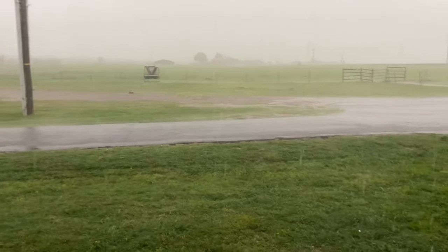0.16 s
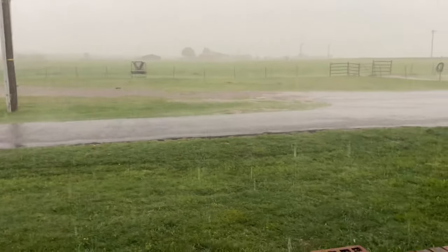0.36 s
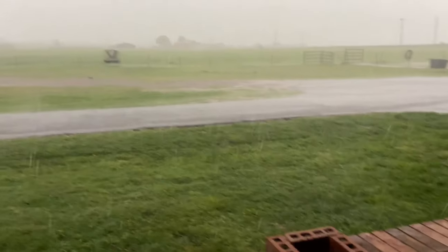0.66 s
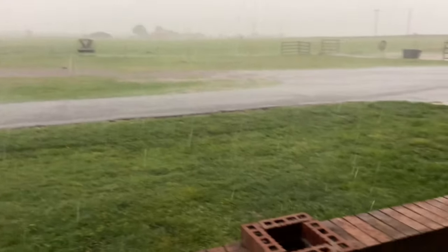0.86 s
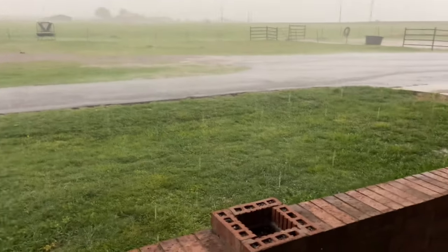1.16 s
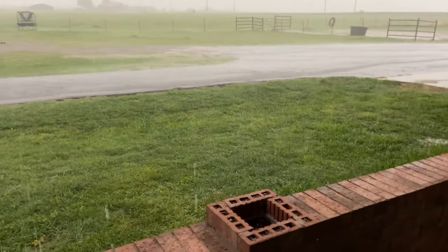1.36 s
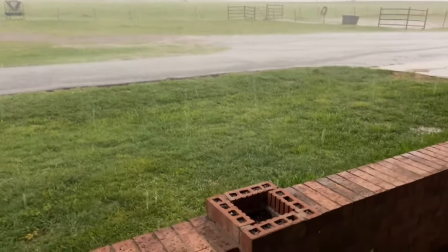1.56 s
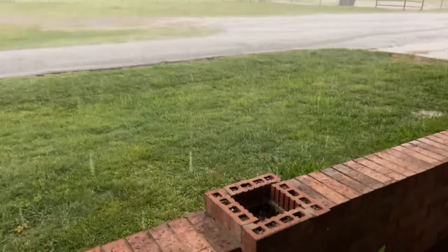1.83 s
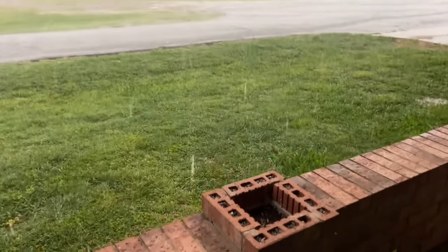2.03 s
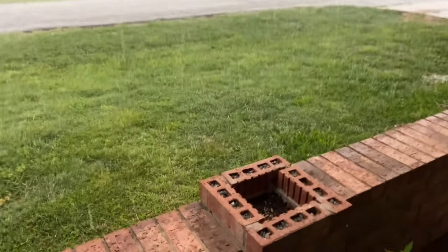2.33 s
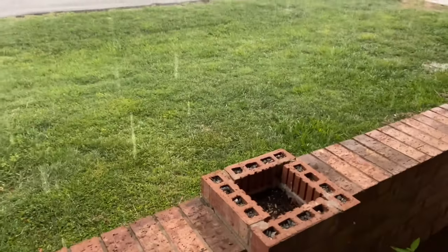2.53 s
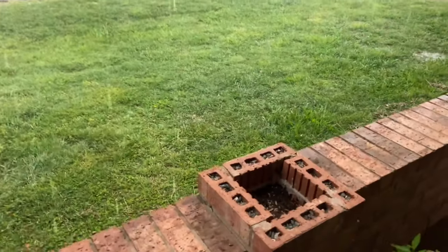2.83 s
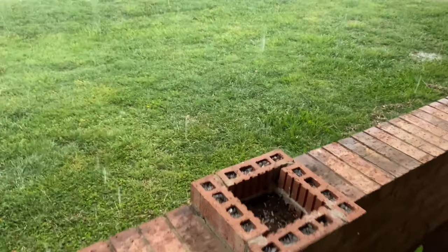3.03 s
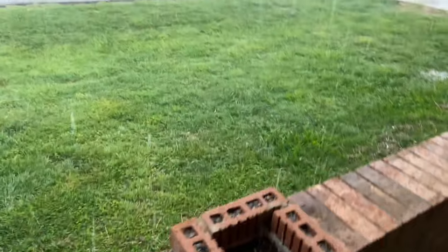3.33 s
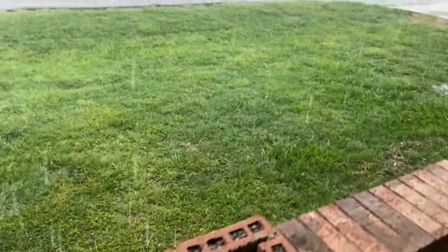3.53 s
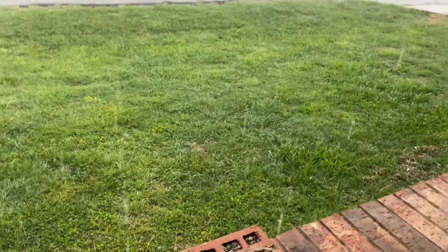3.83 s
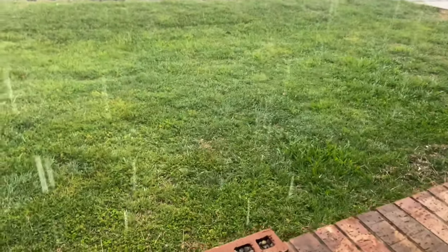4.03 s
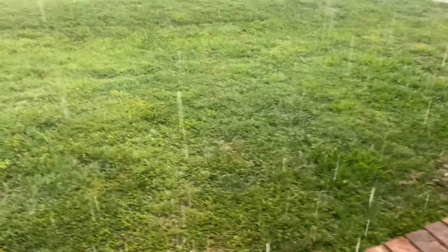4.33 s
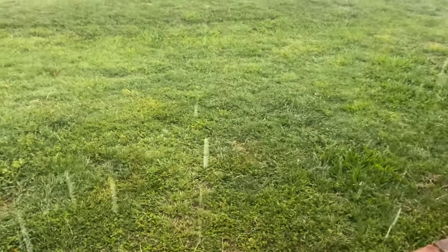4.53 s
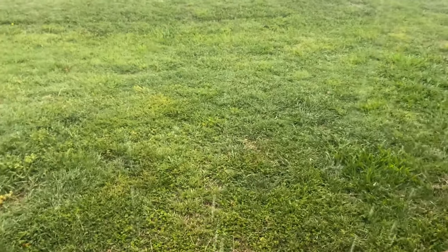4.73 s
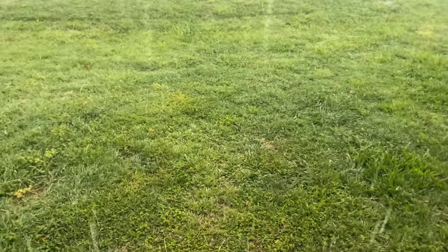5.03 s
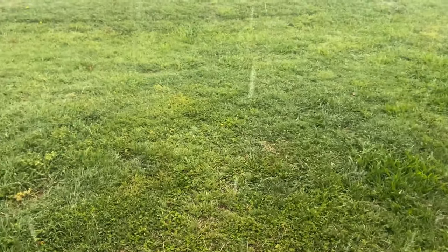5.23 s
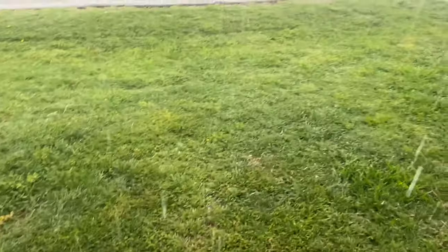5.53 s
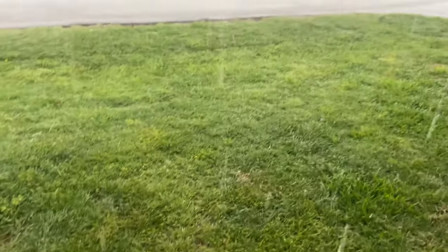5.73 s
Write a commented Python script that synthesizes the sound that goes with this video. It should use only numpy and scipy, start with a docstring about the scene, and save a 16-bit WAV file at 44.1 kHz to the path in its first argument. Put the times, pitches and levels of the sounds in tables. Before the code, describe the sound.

Heavy, steady rain hisses over lawn and driveway, with close drops ticking, splashes bursting nearby and a low rumble of wind.

```python
"""A brick porch, facing a lawn and a driveway in heavy rain, heard at the two ports of a hand-held phone.
Far drops merge into a wash of shaped noise; nearer ones patter and tick as damped sines.
Now and then a gob of water bursts into spray: droplets and mist over a low slosh. Late on, one fat drop
and its rebounds knock on something hollow, a sum of decaying modes. Moving air rumbles underneath
as low noise with gusts and soft bumps; scattered reflections from the porch follow the close drops."""
import sys
import numpy as np
from scipy import signal
from scipy.fft import rfft, irfft, next_fast_len
from scipy.io import wavfile
from scipy.ndimage import uniform_filter1d, map_coordinates

SR = 44100
rng = np.random.default_rng(int(sys.argv[2]) if len(sys.argv) > 2 else 0)


def log_audio(samples):
    """Write samples as a 16-bit WAV file to the path given in sys.argv[1]."""
    # one column per channel
    frames = np.atleast_2d(samples).T
    # limit to full scale, then quantise
    limited = np.clip(frames, -1, 1)
    pcm = np.round(limited * 32767).astype(np.int16)
    wavfile.write(sys.argv[1], SR, pcm)


N = 259308

PORT_LAG = .000275  # (s) the rain reaches the left port later
TOP_HZ = 15750  # upper band limit

# where the phone points, 0 = out at the driveway, 1 = down at the lawn: time_s, lawn_share
FACING = [(0, 0.021), (.9, 0.6), (2, 0.84), (3.2, 1), (5.88, 0.75)]


def amp(db):
    """Level to linear amplitude: 20 dB is a factor of ten."""
    return 10 ** (np.asarray(db) / 20)


def unit(x):
    """Normalisation by signal power: x at rms 1."""
    return x / np.sqrt(np.mean(x ** 2) + 1e-20)


def along(points, hz):
    """Interpolation of (Hz, value) points on a logarithmic frequency axis."""
    f, v = np.transpose(points)
    return np.interp(np.log(hz + 1), np.log(f + 1), v)


def curve(rows):
    """Linear interpolation of (s, value) rows to one value per sample."""
    return np.interp(np.arange(N) / SR, *np.transpose(rows))


def wobble(rate):
    """Slow random modulation: a spline through Gaussian knots, rate of them a second."""
    knots = rng.standard_normal(int(N * rate / SR) + 4)
    return map_coordinates(knots, [np.arange(N) * rate / SR])


def filtered(x, response):
    """Linear filtering: the spectrum of x times a complex response of frequency."""
    n = x.shape[-1]
    m = next_fast_len(n + 8192)  # padding keeps the ends apart
    return irfft(rfft(x, m) * response(np.fft.rfftfreq(m, 1 / SR)), m)[..., :n]


def add(track, s, sound):
    """Superposition: mix a sound into the track from time s on."""
    part = track[..., max(round(s * SR), 0):][..., :sound.shape[-1]]
    part += sound[..., :part.shape[-1]]


def fade(t, t60):
    """Exponential decay: 60 dB in t60, in the unit of t."""
    return np.exp(-np.log(1000) * t / t60)


def burst(t, rise, t60):
    """Excitation and damping: an envelope that rises quickly and dies away."""
    return (1 - np.exp(-t / rise)) * fade(t, t60)


def band(centre_hz, octaves):
    """Band-pass weighting: a Gaussian bell on a logarithmic frequency axis."""
    return lambda hz: np.exp(-.5 * (np.log2((hz + 1) / centre_hz) / octaves) ** 2)


def ports(pair):
    """Interaural-style coherence: mixing two unrelated signals sets likeness, a phase slope sets lag."""
    # likeness of the two ports: frequency_hz, likeness (0-1)
    alike = [(100, 0.8), (300, 0.76), (700, 0.35), (1200, 0.45), (1700, 0.52), (2250, 0.06), (3100, 0.3),
             (4500, 0.15), (5800, 0.05), (7000, 0.5), (9000, 0.95), (10500, 0.65), (13000, 0.95),
             (15000, 0.5)]
    turn = lambda hz: np.arccos(np.clip(along(alike, hz), -1, 1)) / 2
    mid, side = filtered(pair, lambda hz: np.array([np.cos(turn(hz)), np.sin(turn(hz))]))
    left_later = lambda hz: np.exp(1j * np.pi * PORT_LAG * np.outer([-1, 1], hz))
    return filtered(np.array([mid + side, mid - side]), left_later)


def hiss(response, size):
    """Filtered random noise: a wide stereo hiss of rms 1 with the given colour."""
    return unit(ports(filtered(rng.standard_normal((2, size)), response)))


def patchy(pair, depth_db, size):
    """Time-frequency modulation: patches of random gain, size being their extent in bins and frames."""
    z = signal.stft(pair, nperseg=512)[2]
    field = rng.standard_normal(z.shape[1:])
    field = uniform_filter1d(field, size=size[0], axis=0)
    field = uniform_filter1d(field, size=size[1], axis=1)
    return signal.istft(z * amp(depth_db * unit(field)), nperseg=512)[1][:, :pair.shape[1]]


def pitches(centre_hz, octaves, count):
    """Log-normal distribution of drop pitches, capped at the band limit."""
    return np.minimum(centre_hz * 2 ** (octaves * rng.standard_normal(count)), TOP_HZ)


def impacts(times, sizes, hz, cycles, scatter):
    """Damped oscillation: each drop loses 60 dB in the given cycles; direction sets its lag between ports."""
    # spectral weighting of every drop: frequency_hz, gain_db
    drop_colour = [(40, -50), (300, -17), (1500, 9.5), (6000, 15.5), (8500, 10.5), (12000, 11), (13800, 3),
                   (15800, -8)]
    lag = PORT_LAG * (1 - scatter * rng.exponential(size=len(times)) ** 2).clip(-1, 1)
    index = (times * SR).astype(int)[:, None] + np.arange(128)
    sides = []
    for arrival in (times + lag / 2, times - lag / 2):
        # the extra lag lets no arrival fall before its first sample
        turns = np.maximum(index / SR - arrival[:, None] - PORT_LAG, 0) * hz[:, None]
        waves = sizes[:, None] * np.sin(2 * np.pi * turns) * fade(turns, cycles)
        sides.append(np.bincount(index.ravel(), waves.ravel(), N)[:N])
    return filtered(np.array(sides), lambda hz: amp(along(drop_colour, hz)))


def wash(patchy_db):
    """Incoherent summation: countless far drops become coloured noise that flickers in small patches."""
    # relative power density of the far rain: frequency_hz, density_db (per Hz)
    wash_colour = [(30, -39), (90, -4.5), (200, -0.7), (300, -0.8), (900, -2), (1450, -0.2), (2050, -4.5),
                   (2800, -3.1), (3700, -7.6), (5400, -6.1), (6700, -8), (7500, -11.5), (8500, -15.5),
                   (11500, -15.5), (12500, -18), (14000, -25), (15800, -28)]
    pair = patchy(rng.standard_normal((2, N)), patchy_db, size=(4, 8))
    return unit(ports(filtered(pair, lambda hz: amp(along(wash_colour, hz)))))


def patter(centre_hz, octaves, spread_db, count):
    """Random arrivals on nearer grass and brick: many faint drops, a few strong ones."""
    times = rng.uniform(0, N / SR, count)
    sizes = amp(spread_db * np.minimum(rng.exponential(size=count), 4))
    return unit(impacts(times, sizes, pitches(centre_hz, octaves, count), cycles=3.6, scatter=0.12))


def spatters(level_db, spread_db, life, count, size):
    """Clustered arrivals: a drop breaking on brick throws droplets of like pitch, life seconds on average."""
    start = rng.uniform(0, N / SR, (count, 1))
    age = life * rng.exponential(size=(count, size))
    strength = amp(spread_db * rng.uniform(-0.23, 1, (count, 1))) * rng.uniform(0.42, 1, (count, size))
    cluster_hz = np.repeat(pitches(centre_hz=8500, octaves=0.74, count=count), size)
    hz = np.minimum(cluster_hz * 2 ** (0.28 * rng.standard_normal(count * size)), TOP_HZ)
    times = (start + age).ravel()
    return amp(level_db) * unit(impacts(times, strength.ravel(), hz, cycles=14.0, scatter=0.047))


def plinks(level_db, count):
    """Bubble resonance: air trapped in standing water rings briefly, rising a little in pitch."""
    out, t = np.zeros((2, N)), np.arange(SR // 16) / SR
    starts = rng.uniform(0, N / SR, count)
    tones = pitches(2684, .65, count)
    places = rng.uniform(0.06, 1, (count, 3))
    for s, hz, (left, right, lag) in zip(starts, tones, places):
        turns = hz * np.maximum(t - np.array([[lag * PORT_LAG], [0]]), 0)
        ring = np.sin(2 * np.pi * turns * (1 + .6 * t)) * fade(turns, 130)  # 60 dB in 130 cycles
        add(out, s, np.array([[left], [right]]) * ring)
    return amp(level_db) * unit(out)


def rain():
    """Surface-dependent radiation: paving crackles, grass drums softly; the mix shifts as the phone turns."""
    # strength shared by all rain layers, nearly steady: time_s, level_db (relative)
    downpour = [(0.0, -31), (1.15, -30), (2.3, -30.5), (2.65, -30), (5.88, -29.5)]
    strength = amp(curve(downpour) + 0.2 * wobble(10))
    lawn = np.clip(curve(FACING), 0, 1)
    pocks = patter(centre_hz=2880, octaves=.3, spread_db=4, count=1800)
    paving = amp(-5.5) * unit(filtered(pocks, band(centre_hz=2800, octaves=0.13)))
    paving += amp(-9) * hiss(band(centre_hz=1450, octaves=0.23), N)
    grass = amp(-9.0) * hiss(band(centre_hz=585, octaves=0.94), N)
    drops = amp(-7.5) * patter(centre_hz=4300, octaves=0.75, spread_db=3.2, count=9000)
    drops += spatters(level_db=-11, spread_db=3, life=.008, count=190, size=20)
    drops += plinks(level_db=-10.5, count=330)
    far = wash(patchy_db=.9)
    return strength * (amp(3.0) * far + drops + (1 - lawn) * paving + np.sqrt(lawn) * grass)


def air():
    """Low-frequency turbulence: a rumble nearly alike at both ports, gusts, a hollow drone and soft bumps."""
    # relative power density of the rumble: frequency_hz, density_db (per Hz)
    rumble_colour = [(12, -50), (25, -33), (35, -6), (48, -1), (64, 5), (90, -0.5), (125, -2.5), (180, -11),
                     (400, -73)]
    # bell-shaped swells: crest_s, lift_db, width_s (standard deviation)
    gusts = [(0.4, 2.5, 0.08), (1.05, 2, 0.1), (1.37, 8.5, 0.085), (2.75, 2.5, 0.17), (5.68, 4.5, 0.091)]
    # bumps of air on the phone: start_s, level_db (before the envelope), pitch_hz
    bumps = [(1.704, -9, 79.6), (3.355, -14, 85), (4.281, -12, 79), (5.588, -14, 75), (5.658, -11, 83),
             (5.693, -9.5, 87)]
    air_db, wander_db, wander_rate = -38, 0.36, 3.93  # base level, its slow wander, knots a second

    mid, side = filtered(rng.standard_normal((2, N)), lambda hz: amp(along(rumble_colour, hz)))
    rumble = unit(mid + amp(-16) * np.array([side, -side]))
    drone = hiss(band(centre_hz=282, octaves=0.2), N) * amp(-4 * curve(FACING))  # fainter towards the lawn
    t = np.arange(N) / SR
    gust_db = sum(lift_db * np.exp(-.5 * ((t - s) / width) ** 2) for s, lift_db, width in gusts)
    swell = amp(air_db + gust_db + wander_db * wobble(wander_rate))
    out = swell * (amp(2.0) * rumble + amp(-4.5) * drone)
    t = np.arange(SR // 6) / SR
    for s, level_db, pitch_hz in bumps:
        add(out, s, amp(level_db) * np.sin(2 * np.pi * pitch_hz * t) * burst(t, rise=0.0038, t60=0.05))
    return out


def splashes(mist_db, droplet_db, spread_db, count):
    """Break-up of a liquid mass: droplets and mist over a slosh; duller, heavier drops fall back after."""
    # gobs bursting, levels relative: start_s, spray_db, lowest_hz (of the spray), rise_s, t60_s,
    # fall_db (drops falling back), slosh_db
    gobs = [(0.001, -25.5, 2400, .003, .3, -36, -26), (0.36, -26, 2400, .02, .35, -27, -40),
            (0.615, -26.5, 5600, .005, .25, -45, -45), (1.1055, -15.6, 2500, .001, .35, -18.5, -24),
            (1.47, -28, 4500, .008, .3, -45, -45), (2.501, -19.2, 2700, .004, .45, -26, -26),
            (2.718, -25, 2800, .005, .2, -40, -35), (3.05, -27, 5400, .004, .2, -28, -27),
            (3.992, -19.7, 5500, .0015, .38, -28, -27), (4.3, -26, 2400, .02, .4, -27, -24),
            (4.909, -21, 4300, .018, .33, -34, -31), (5.577, -25, 2400, .004, .18, -34, -30),
            (5.642, -17.3, 2400, .02, .32, -29, -26)]
    # spray with three bright ridges: frequency_hz, density_db (per Hz)
    spray_colour = [(2000, 0.5), (2750, 5), (3800, -2.5), (5300, 2.5), (6300, -1.5), (7200, -0.5),
                    (8200, -3.5), (9800, -3.5), (12000, -7), (13000, -14), (15800, -28)]
    big_gob_db = -17.5  # a spray level this high throws the full number of droplets
    fall_delay_s, fall_low_hz, fall_high_hz, fall_rise_s, fall_t60_s = 0.012, 2050, 4600, 0.016, 0.41
    out, t = np.zeros((2, N)), np.arange(SR // 2) / SR

    def spray(lowest_hz, highest_hz, level_db):
        """Band-limited mist and single droplets; a smaller gob throws fewer droplets."""
        def colour(hz):
            """Filter slopes: steep below the lowest pitch, gentle above the highest."""
            edges = (1 + (lowest_hz / (hz + 1)) ** 14) * (1 + (hz / highest_hz) ** 4)
            return amp(along(spray_colour, hz)) / np.sqrt(edges)

        n = int(count * np.clip(amp(level_db - big_gob_db), .25, 1))
        when, strength, pitch = rng.uniform(size=(count, 3))[:n].T
        droplet_hz = lowest_hz + pitch * (TOP_HZ - lowest_hz) * .7
        droplets = impacts(when * t[-1], amp(-spread_db * strength), droplet_hz, cycles=9, scatter=.2)
        droplets = unit(filtered(droplets[:, :len(t)], colour))
        mist = unit(patchy(hiss(colour, len(t)), depth_db=3.2, size=(3, 2)))
        return amp(level_db) * (amp(mist_db) * mist + amp(droplet_db) * droplets)

    for s, spray_db, lowest_hz, rise, t60, fall_db, slosh_db in gobs:
        add(out, s, spray(lowest_hz, TOP_HZ, spray_db) * burst(t, rise, t60))
        falling = spray(fall_low_hz, fall_high_hz, fall_db)
        add(out, s + fall_delay_s, falling * burst(t, fall_rise_s, fall_t60_s))
        slosh = hiss(band(centre_hz=1000, octaves=1.0), len(t))
        add(out, s, amp(slosh_db) * slosh * burst(t, rise=0.015, t60=0.51))
    return out


def ticks(sputter_db, impact_db):
    """Impulsive excitation: each closest drop is a sharp impact and a short sputter of noise."""
    # the closest single drops: start_s, level_db (relative), pitch_hz
    close_drops = [(0.267, -28, 4600), (1.601, -19, 2730), (1.893, -25, 5600), (2.1116, -29, 2290),
                   (2.3505, -23, 2930), (2.725, -27, 3600), (3.056, -31, 6000), (3.203, -23.5, 7600),
                   (3.338, -30, 7500), (4.487, -27, 2900), (4.553, -19, 5200), (4.559, -26, 4400),
                   (5.125, -27, 8000), (5.211, -22, 7500), (5.528, -21, 1820), (5.5827, -17.5, 2860),
                   (5.802, -28, 6700)]
    starts, db, hz = np.transpose(close_drops)
    out, t = np.zeros((2, N)), np.arange(SR // 16) / SR
    for start, level_db, pitch_hz in close_drops:
        sputter = hiss(band(1.4 * pitch_hz, octaves=.55), len(t))
        add(out, start, amp(level_db + sputter_db) * sputter * fade(t, t60=0.056))
    return out + impacts(starts, amp(db + impact_db), hz, cycles=13.0, scatter=0.05)


def porch(x, t60):
    """Reverberation by convolution: walls and roof give a short, scattered answer."""
    t = np.arange(SR // 5) / SR
    tail = rng.standard_normal((2, len(t))) * fade(t, t60) * (t > .004)
    return signal.fftconvolve(x, tail / np.linalg.norm(tail[0]), axes=1)[:, :N]


def snaps(centre_hz, t60):
    """Flat-impact transient: a gob landing flat throws a very short, bright sheet of mist."""
    # flat landings: start_s, level_db (before the decay)
    landings = [(1.1058, -17), (3.9935, -24), (3.9985, -22)]
    out, t = np.zeros((2, N)), np.arange(SR // 16) / SR
    for s, level_db in landings:
        add(out, s, amp(level_db) * hiss(band(centre_hz, octaves=0.44), len(t)) * fade(t, t60))
    return out


def pings():
    """Free decay of sines: the biggest gob lands with a crack, its bubbles leave thin, brief tones."""
    # the crack and the tones: start_s, level_db (before the decay), pitch_hz, t60_s
    tones = [(1.1061, -6, 7400, .004), (1.1063, -26, 7190, .12), (1.107, -22, 2950, .07),
             (1.118, -17.5, 5350, .06), (1.156, -21, 2550, .07)]
    out, t = np.zeros((2, N)), np.arange(SR // 6) / SR
    since = np.maximum(t - np.array([[PORT_LAG], [0]]), 0)
    for s, level_db, pitch_hz, t60 in tones:
        add(out, s, amp(level_db) * np.sin(2 * np.pi * pitch_hz * since) * fade(since, t60))
    return out


def knock():
    """Modal synthesis: a fat drop and its rebounds ring a hollow body, with other phases at each port."""
    # the drop and its rebounds: start_s, level_db (relative)
    blows = [(5.3096, -19.5), (5.3110, -14.5), (5.3150, -24)]
    # modes of the hollow body: frequency_hz, level_db (relative), t60_s
    modes = [(1330, 0, .05), (1450, 0, .05), (1645, 1, .05), (1920, -8, .045), (2490, -1, .04),
             (2850, -6, .035), (3170, -1, .045), (3470, -1, .06), (4550, -4.5, .045), (4950, -12, .05),
             (7300, -5, .03), (7680, -7, .035)]
    out, t = np.zeros((2, N)), np.arange(SR // 6) / SR
    hz, db, t60 = np.transpose(modes)[:, :, None]
    for s, level_db in blows:
        phase = 0.55 * rng.standard_normal((2, *hz.shape))
        ring = (amp(db) * np.sin(2 * np.pi * hz * t + phase) * fade(t, t60)).sum(axis=1)
        ring *= 1 - np.exp(-t / .00015)  # soft onset
        noise = rng.standard_normal((2, len(t)))
        spatter = unit(filtered(noise, band(centre_hz=2700, octaves=0.95))) * fade(t, t60=0.045)
        add(out, s, amp(level_db) * (amp(-6.5) * ring + amp(-3.5) * spatter))
    return out


def scene():
    """Superposition of sources: rain all round, near water on top, air below."""
    hits = ticks(sputter_db=-9, impact_db=-6) + knock()
    bursts = splashes(mist_db=-5.7, droplet_db=-3.4, spread_db=18, count=2400)
    near = hits + amp(-6) * porch(hits, t60=0.13) + bursts + pings() + snaps(centre_hz=10800, t60=0.045)
    return (rain() + near) * amp([[-.2], [.2]]) + air()  # water slightly louder on the right


def record(dry):
    """Band limiting: the phone cuts the deepest bass and keeps nothing above its upper limit."""
    thinned = signal.sosfilt(signal.butter(2, 26, "highpass", fs=SR, output="sos"), dry)
    return filtered(thinned, lambda hz: hz < TOP_HZ)


dry = scene()
out = record(dry)
log_audio(out)
```